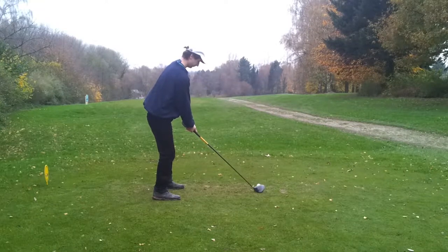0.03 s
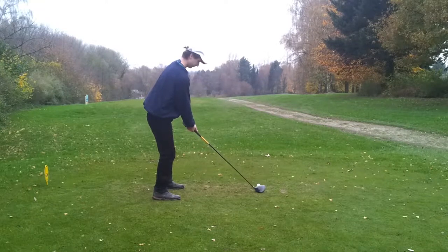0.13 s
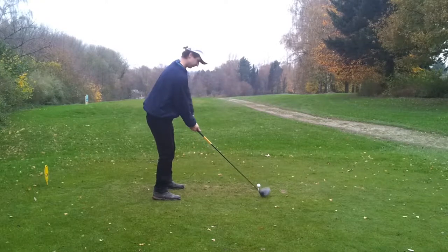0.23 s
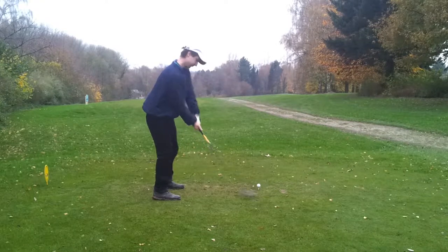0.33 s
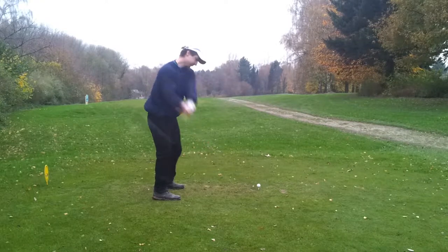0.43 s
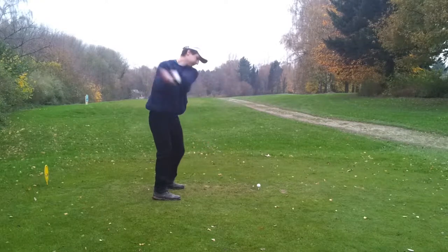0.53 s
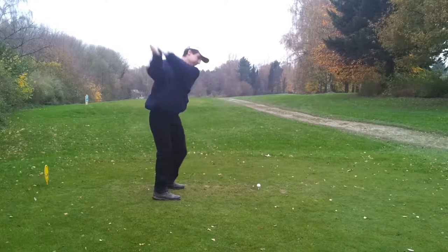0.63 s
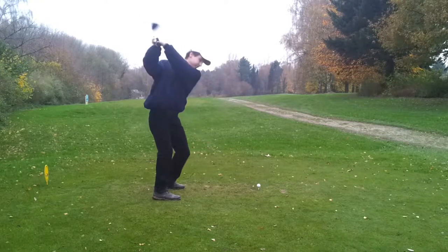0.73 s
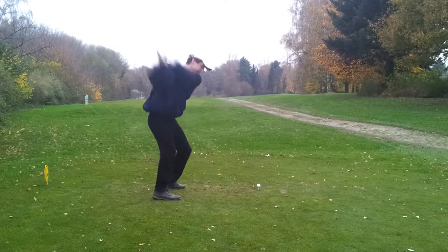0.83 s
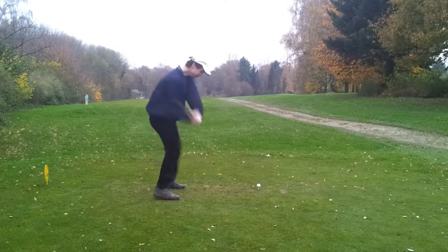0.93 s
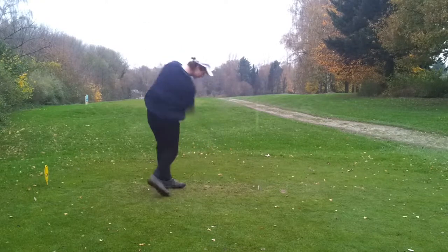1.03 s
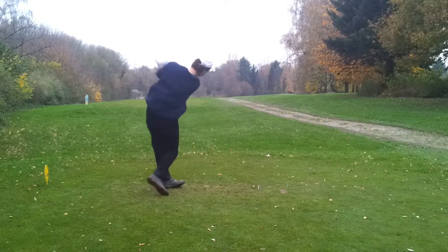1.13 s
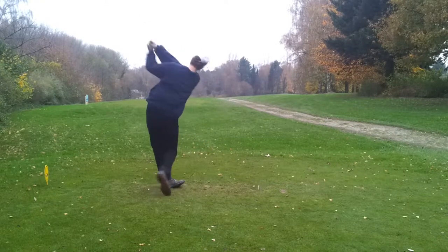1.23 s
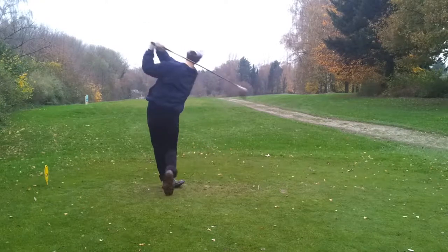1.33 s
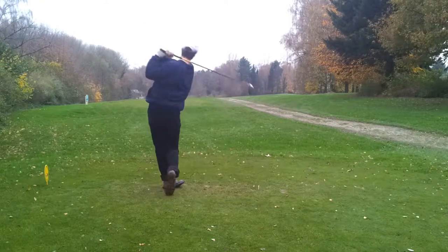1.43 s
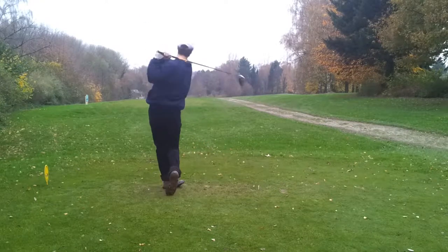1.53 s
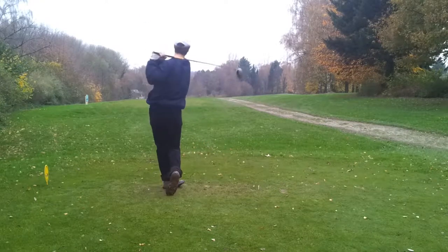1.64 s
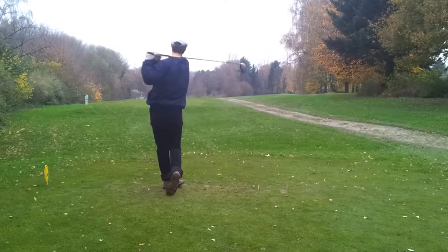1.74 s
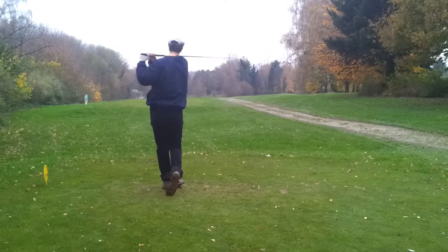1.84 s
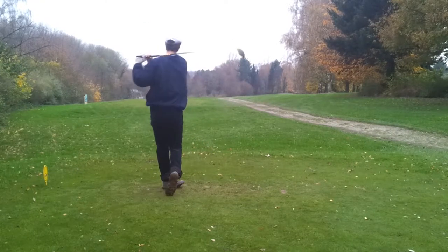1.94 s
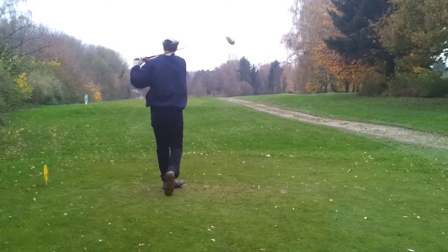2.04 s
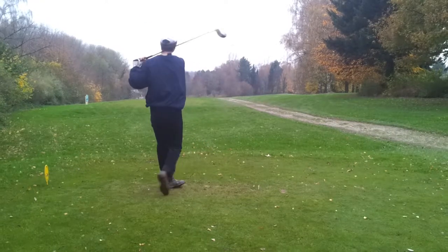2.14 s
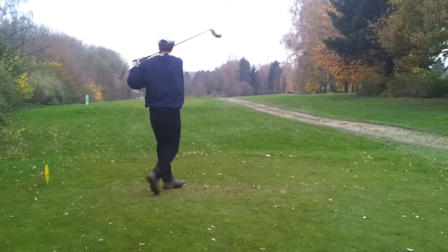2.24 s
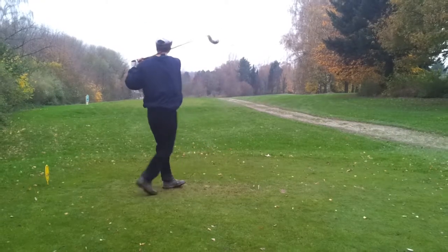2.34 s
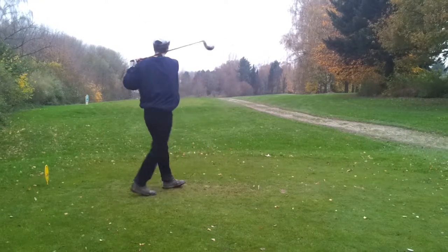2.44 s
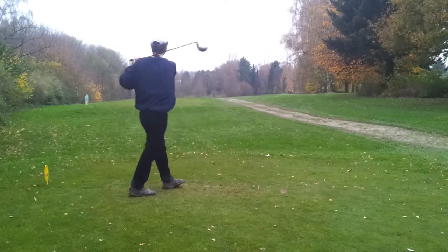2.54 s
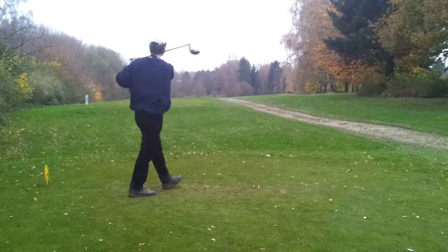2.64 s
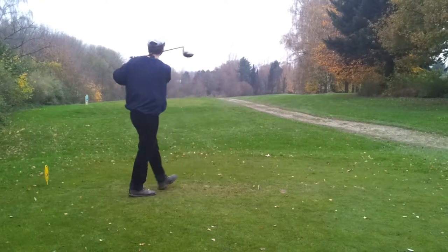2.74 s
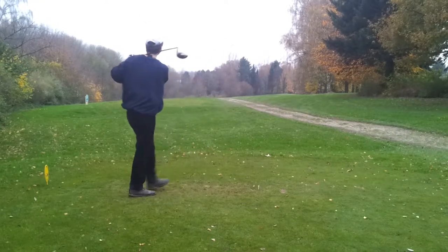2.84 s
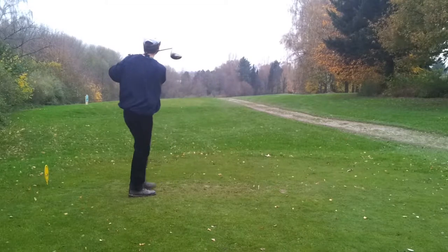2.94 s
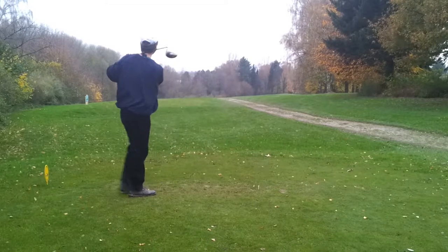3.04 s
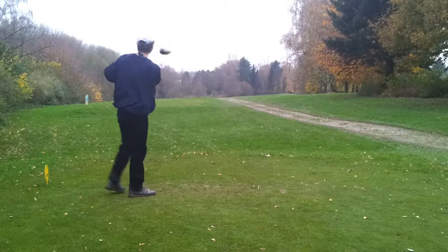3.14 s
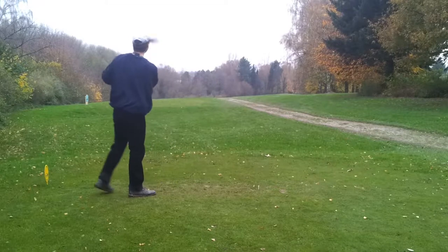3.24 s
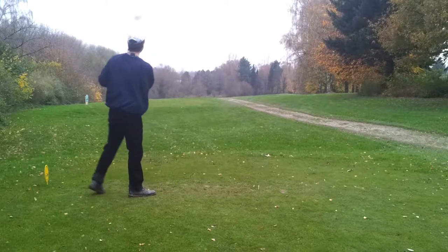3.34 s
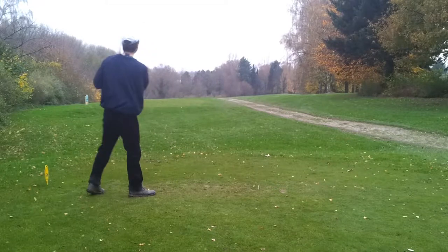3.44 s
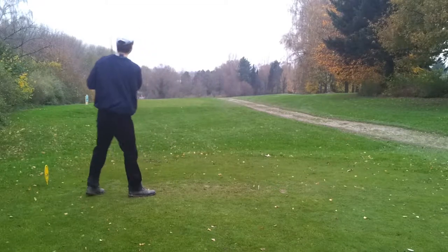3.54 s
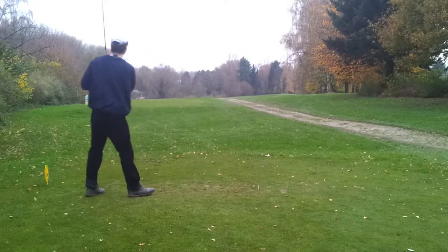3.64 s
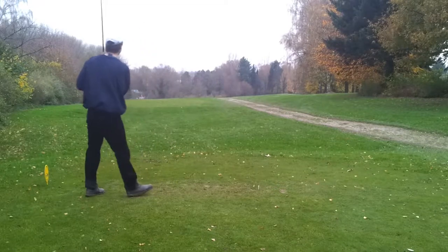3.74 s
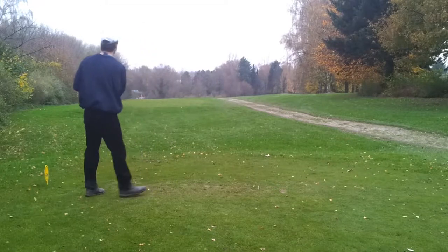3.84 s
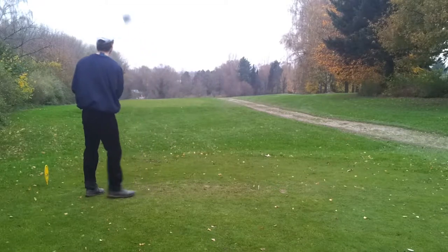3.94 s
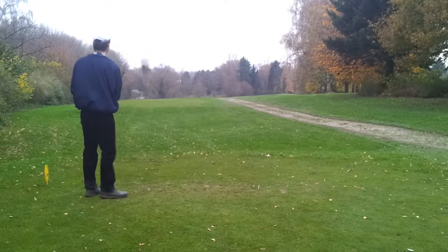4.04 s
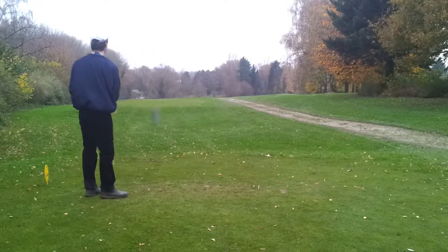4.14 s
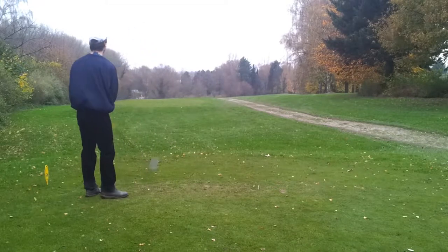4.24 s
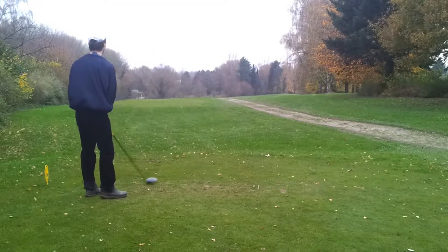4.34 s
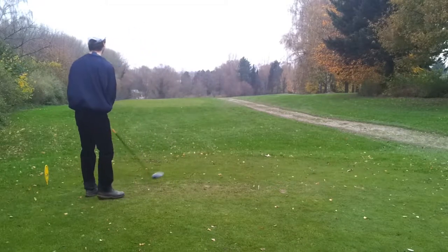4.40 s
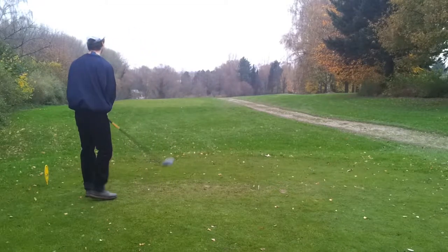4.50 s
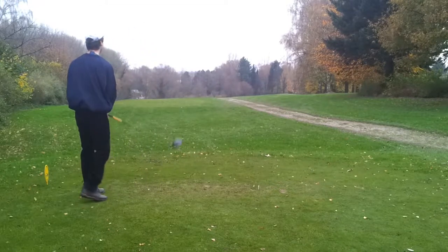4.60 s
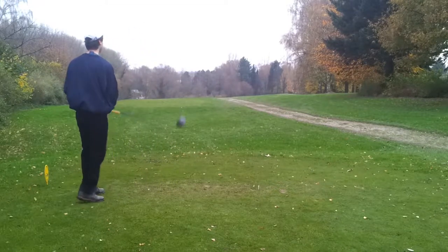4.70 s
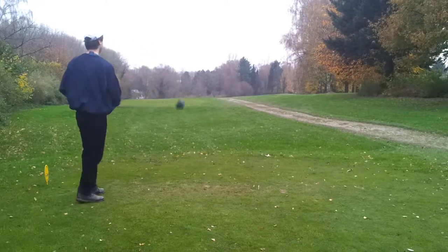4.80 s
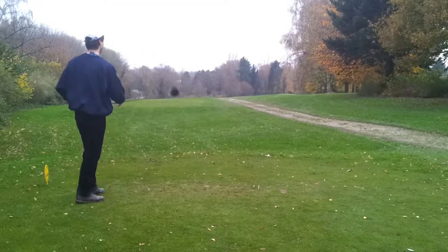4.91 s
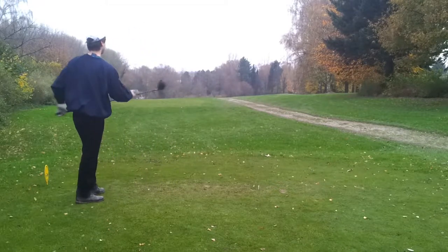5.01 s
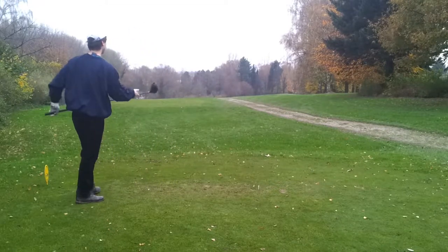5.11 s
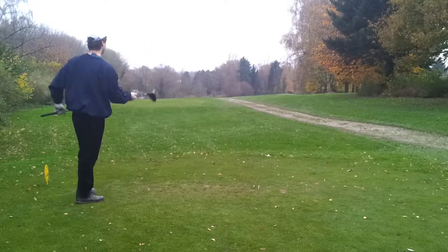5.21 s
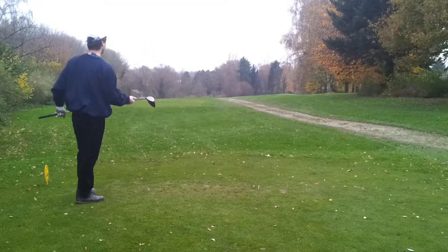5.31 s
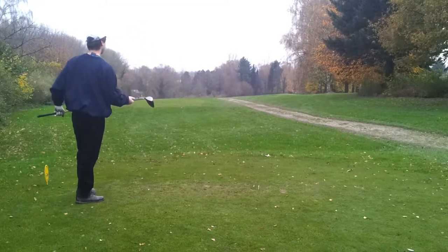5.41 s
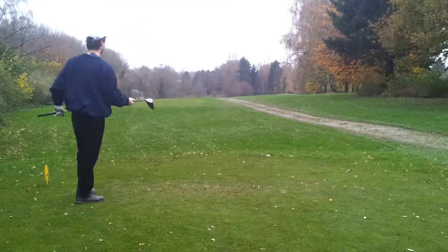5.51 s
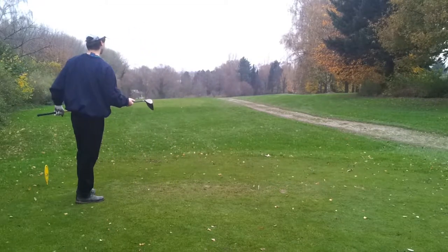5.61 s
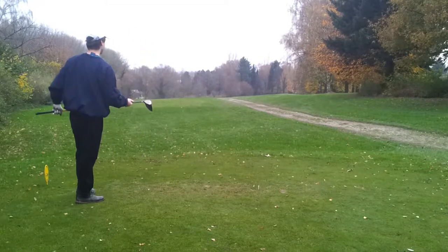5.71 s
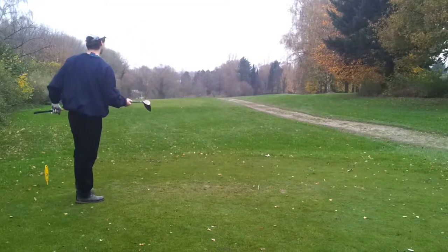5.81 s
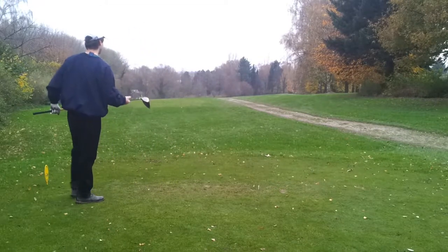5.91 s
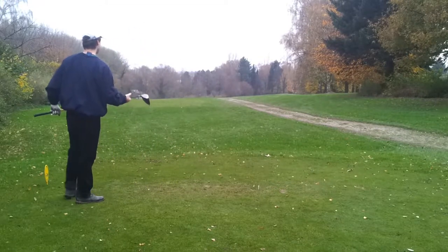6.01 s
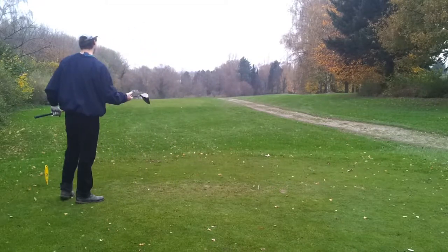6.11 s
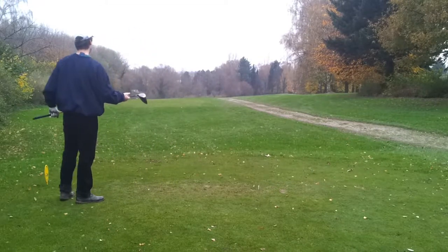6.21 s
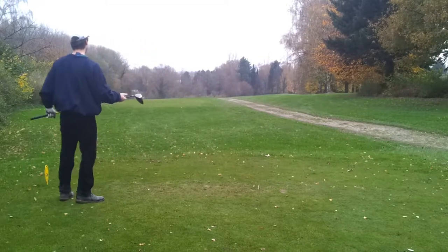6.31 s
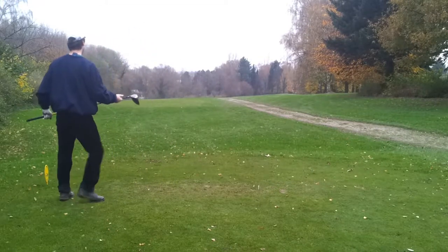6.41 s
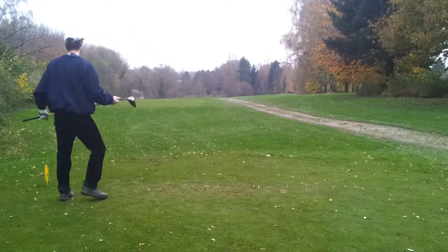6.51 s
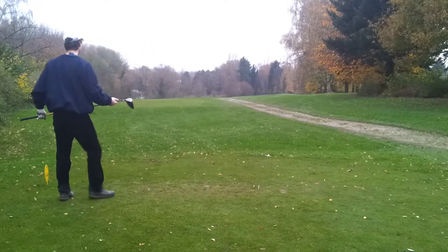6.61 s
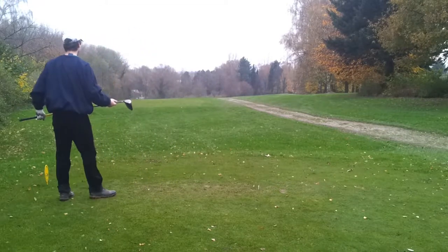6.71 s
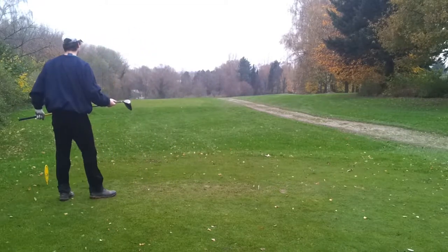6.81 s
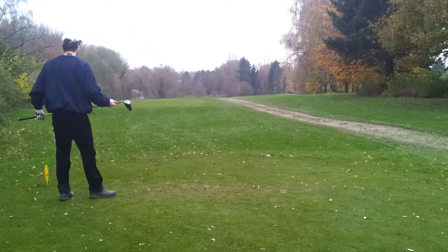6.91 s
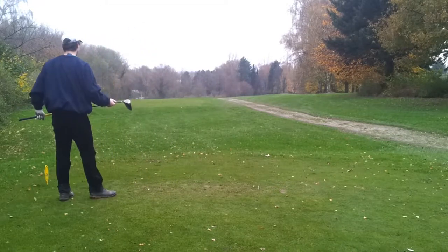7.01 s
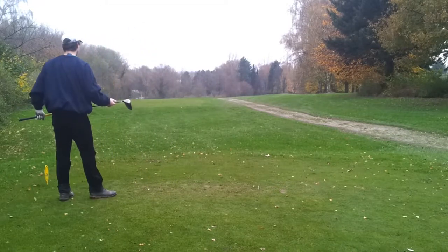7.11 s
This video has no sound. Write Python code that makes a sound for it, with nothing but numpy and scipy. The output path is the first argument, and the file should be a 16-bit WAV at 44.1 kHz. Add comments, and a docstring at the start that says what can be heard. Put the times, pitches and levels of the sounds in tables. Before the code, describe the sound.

A mono outdoor scene of about seven seconds on a tree-lined golf course. From the start there is quiet far traffic, a low rumble with soft roar, and a faint, slowly sagging engine hum near 130 hertz. At 1.05 s a very brief swish rises in pitch and hiss, leading at 1.2 s to one hard, dry, overloaded crack with a small low thud and a bright hollow metal ring around 6 kilohertz. The ring dips in pitch and blurs into dense, shimmering tree echoes, mostly gone by 2 s, with a weak tail behind. Dull, faint steps on turf come at 1.5 and 2.6 s, the latter with a soft rustle. Thin falling bird chirps dot 2.3 to 5.9 s. At 4.5 s the club taps the grass with a small tick and thump. Tiny rustles follow to 6.8 s; the hum swells most around 4.6 s.

```python
"""A hollow metal golf club swishes down and strikes a ball on a fairway lined with trees: crack, thud, ringing head.
The modes of the head ring while it flies on, Doppler-shifted: low as it leaves the listener, low to high
in the echoes from the trees, which are sparse random clicks through resonators. The swish is a climbing
shaft tone and band-passed hiss. Behind: steps and club on turf, rustles of clothes and grass, gliding
bird notes, a sagging engine hum with its octave, and far traffic as coloured noise."""
import sys
import numpy as np
from scipy import signal
from scipy.fft import rfft, irfft
from scipy.io import wavfile

SR = 44100
rng = np.random.default_rng(int(sys.argv[2]) if len(sys.argv) > 2 else 0)


def transcribe(u):
    """Save the signal u as a 16-bit wav file named by the first command-line argument.

    u: samples, shape (n,) or (channels, n), limited to [-1, 1]; the rate is SR.
    q: integer samples, one column per channel.
    """
    v = np.clip(np.atleast_2d(u).T, -1, 1)
    q = np.round(v * 32767).astype(np.int16)
    wavfile.write(sys.argv[1], SR, q)


N = 315429

STRIKE_S = 1.1957
HEAD_SPEED_M_PER_S, SOUND_SPEED_M_PER_S = 36.5, 343   # head just after the blow; air

# modes of the head at rest: f/Hz, relative direct level/dB, t60/s, relative echo level/dB,
# echo gain ahead over sideways/dB
HEAD_MODES = [(367.4, -20, 0.069, -50, 0), (547, -15, 0.035, -49.5, -3), (775, -12, .025, -39, 2),
              (1340, -17.5, 0.019, -28, 1.5), (1850, -12.5, 0.011, -27, -0.5), (3019, -20.5, .2, -5.5, 2),
              (4225, -13, 0.16, -12.5, 0), (4685, -13, .07, -16.5, 0.5), (6008, -1.5, .3, 0.5, -1.5),
              (5930, -7, 0.15, -7, 1.5), (6450, -11, 0.16, -15.5, 4), (7440, -22.5, 0.17, -12.5, 0),
              (7660, -11, 0.13, -19, 0), (8000, -13, 0.06, -30, 0)]


def from_db(db):
    """Gain of a level in dB."""
    return 10 ** (np.asarray(db) / 20)


def rms_one(x):
    """Scale to rms 1."""
    return x / np.sqrt(np.mean(x ** 2) + 1e-20)


def in_time(rows):
    """Interpolate the columns of a curve table, sample by sample."""
    t_s, *columns = np.transpose(rows)
    return [np.interp(np.arange(N) / SR, t_s, column) for column in columns]


def coloured(spectrum, size):
    """Noise of rms 1, its spectrum interpolated in dB over log frequency."""
    hz, db = np.transpose(spectrum)
    bins_hz = np.fft.rfftfreq(size, 1 / SR)
    shape_db = np.interp(np.log(bins_hz + 1), np.log(hz), db)
    white = rng.standard_normal(size)
    return rms_one(irfft(rfft(white) * from_db(shape_db), size))


def band(x, low_hz, high_hz):
    """Butterworth band-pass."""
    edges_hz = [low_hz, min(high_hz, SR / 2.2)]
    return signal.sosfilt(signal.butter(2, edges_hz, "band", fs=SR, output="sos"), x)


def ring(clicks, hz, t60_s):
    """Two-pole resonator: a unit click starts a decaying sine of height 1."""
    radius = from_db(-60 / (t60_s * SR))
    angle = 2 * np.pi * hz / SR
    return signal.lfilter([0, np.sin(angle)], [1, -2 * radius * np.cos(angle), radius ** 2], clicks)


def add(out, start_s, sound):
    """Mix a sound in at a time."""
    at = round(start_s * SR)
    out[at:at + len(sound)] += sound[:N - at]


def strike():
    """Pressure pulse as the ball squashes, its push on the air, and head modes shifted down by the speed."""
    crack_db, crack_half_cycle_ms = 8.5, 0.34
    thud_hz, thud_db, thud_t60_s = 110, -15.5, 0.039
    arc_radius_m, straight_away_s = 1.45, .011   # circular path; time after the blow when it points away
    shade_s, shade_db_per_s = .03, 1800.   # the golfer's body then shades the head
    ring_db = 5
    dip_s, dip_width_s, dip_db = .0028, .0012, 11   # the ring dips briefly after the crack

    t = np.arange(SR // 10) / SR
    away_m_per_s = HEAD_SPEED_M_PER_S * np.cos((t - straight_away_s) * HEAD_SPEED_M_PER_S / arc_radius_m)
    head_time_s = np.cumsum(1 / (1 + away_m_per_s / SOUND_SPEED_M_PER_S)) / SR   # as heard by the listener
    modes = sum(from_db(db - 60 * t / t60_s) * np.sin(2 * np.pi * hz * head_time_s)
                for hz, db, t60_s, *_ in HEAD_MODES)
    shade = shade_db_per_s * np.maximum(t - shade_s, 0)
    dip = dip_db * np.exp(-((t - dip_s) / dip_width_s) ** 2)
    ringing = from_db(ring_db - shade - dip) * modes * np.minimum(t / .0004, 1)

    half_cycles = t * 1000 / crack_half_cycle_ms
    pulse = -np.sin(np.pi * half_cycles) * np.exp(-.6 * half_cycles) * (half_cycles < 4)
    thud = from_db(thud_db - 60 * t / thud_t60_s) * np.sin(2 * np.pi * thud_hz * t)
    out = np.zeros(N)
    add(out, STRIKE_S, thud + from_db(crack_db) * pulse + ringing)
    return out


def echoes(directions=44, clicks_per_s=170.0):
    """Trees all round return the crack, and the ring at the pitch the moving head sends their way."""
    echo_t60_s = .09   # the ring as one tree returns it
    air_loss_db_per_s = 20   # at 6 kHz; grows with the square of pitch
    # colour of the crack's echo: f/Hz, relative level/dB
    crack_colour = [(100, -26), (300, -16), (600, 2.5), (1000, 1.5), (2000, -2.5), (4000, -1), (5200, -5),
                    (7500, -8)]

    size = SR * 3 // 2
    t = np.arange(size) / SR
    ring_gain, crack_gain = echo_gains(t)
    rings, lossless = np.zeros(size), np.zeros(size)
    for toward in np.cos(np.linspace(0, np.pi, directions)):   # 1 = ahead, -1 = behind
        shift = 1 / (1 - toward * HEAD_SPEED_M_PER_S / SOUND_SPEED_M_PER_S)
        trees = rng.standard_normal(size) * (rng.random(size) < clicks_per_s / SR) + 1e-18
        trees *= from_db(-7. * toward ** 2)   # most trees stand to the sides
        for rest_hz, _, _, db, ahead_db in HEAD_MODES:
            hz = rest_hz * shift
            echo = from_db(db + ahead_db * toward) * ring(trees, hz, echo_t60_s)
            lossless += echo
            rings += echo * from_db(-air_loss_db_per_s * t * (hz / 6000) ** 2)
    crack = coloured(crack_colour, size)
    fade = np.minimum((t[-1] - t) * 10, 1)
    out = np.zeros(N)
    add(out, STRIKE_S, fade * (ring_gain * rings / lossless.std() + crack_gain * crack))
    return out


def echo_gains(t):
    """Gains of ring and crack echoes: each group of reflectors builds up and dies; their powers add."""
    # groups: delay/s, build-up/s, t60/s, ring level before air loss/dB, crack level/dB
    reflectors = [(0.0002, .001, .03, -30, -9), (.003, .006, .24, -6, -27),
                  (.06, 0.022, 0.74, -18.5, -31.5), (.15, 0.12, 2.7, -41, -54.5)]
    power = 0
    for delay_s, rise_s, t60_s, *levels_db in reflectors:
        build_up = np.clip((t - delay_s) / rise_s, 0, 1)
        decay = from_db(-60 * np.maximum(t - delay_s - rise_s, 0) / t60_s)
        power = power + np.outer(from_db(levels_db), build_up * decay) ** 2
    return np.sqrt(power)


def swish():
    """The shaft sheds eddies at a pitch set by its speed; the head hisses through the air."""
    start_s, stop_s = 1.05, 1.26
    shed_hz, shed_hz_per_s = 400., 2800.   # climbs up to the blow, then holds

    t = np.arange(N) / SR
    tone_hz = shed_hz + shed_hz_per_s * (np.clip(t, start_s, STRIKE_S) - start_s)
    flutter = rms_one(band(rng.standard_normal(N), 5, 90.))
    tone = flutter * np.sin(2 * np.pi * np.cumsum(tone_hz) / SR) * np.sqrt(2)
    hiss = rms_one(band(rng.standard_normal(N), 1200., 7800.))
    tone_gain = swell(peak_s=1.152, peak_db=-36.5, rise_db_per_s=450., fall_db_per_s=350.)
    hiss_gain = swell(peak_s=STRIKE_S, peak_db=-38, rise_db_per_s=190., fall_db_per_s=550.)
    return (tone_gain * tone + hiss_gain * hiss) * (t > start_s) * (t < stop_s)


def swell(peak_s, peak_db, rise_db_per_s, fall_db_per_s):
    """Gain that climbs to a peak and falls, at steady dB per second."""
    t = np.arange(N) / SR - peak_s
    return from_db(peak_db + np.minimum(rise_db_per_s * t, -fall_db_per_s * t))


def knocks():
    """Feet and club on turf: a dull ring of the ground, a tick of grass and damped modes of the head."""
    thump_t60_s, head_t60_s = .026, .03
    # t/s, thump level/dB, thump f/Hz, tick gain/dB, head gain/dB
    turf_hits = [(1.535, -38, 366, -76, -80), (2.626, -35, 422, -69.5, -80),
                 (4.488, -30.5, 298, -29.5, -48.5)]

    out = np.zeros(N)
    t = np.arange(SR // 10) / SR
    head = sum(from_db(0.33 * echo_db - 60 * t / head_t60_s) * np.sin(2 * np.pi * hz * t)
               for hz, _, _, echo_db, _ in HEAD_MODES)
    for start_s, thump_db, thump_hz, tick_db, head_db in turf_hits:
        thump = from_db(thump_db - 60 * t / thump_t60_s) * np.sin(2 * np.pi * thump_hz * t)
        snap = from_db(tick_db - 60 * t / .01)
        settling = from_db(tick_db - 18 - 60 * t / 0.16)   # grass
        noise = band(rng.standard_normal(len(t)), 500., 8000.)
        tick = (snap + settling) * noise * np.minimum(t / .001, 1)
        add(out, start_s, thump + tick + from_db(head_db) * head)
    return out


def rustles():
    """Clothes and grass: soft swells of noise in a band under an octave wide."""
    # t/s, length/s, band reference f/Hz, level before the swell/dB
    brushes = [(2.567, 0.13, 600.4, -54), (4.12, 0.11, 6040, -61.5), (4.755, 0.095, 3025, -64),
               (4.835, 0.14, 6500, -67), (5.36, .11, 5820, -63.5), (6.83, .07, 5800, -62.5)]
    out, noise = np.zeros(N), rng.standard_normal(N)
    for start_s, length_s, hz, db in brushes:
        size = round(length_s * SR)
        hiss = rms_one(band(noise[round(start_s * SR):][:size], hz / 1.3, hz * 1.07))
        add(out, start_s, from_db(db) * hiss * np.sin(np.linspace(0, np.pi, size)) ** 0.24)
    return out


def birds():
    """Thin whistles: sines gliding in pitch under a half-sine envelope."""
    low_length_s, low_first_hz, low_last_hz = .028, 3090, 2250
    # one falling chirp, repeated: t/s, rms level at the envelope's peak/dB
    low_chirps = [(2.68, -62), (3.43, -60), (4.193, -61.5), (4.8, -63)]
    # other notes: t/s, length/s, first f/Hz, last f/Hz, rms level at the envelope's peak/dB
    whistles = [(2.295, .052, 4550, 4370, -69), (3.29, .055, 4650, 4420, -65),
                (3.456, .065, 4340, 4440, -64.5), (3.655, .085, 4410, 4260, -69),
                (3.675, .031, 7650, 6900, -63), (4.132, .022, 7700, 7100, -60),
                (4.874, .022, 7400, 6400, -64), (5.175, .028, 7600, 7200, -65),
                (5.385, .03, 5400, 4200, -66), (5.815, .058, 7450, 6850, -64.5),
                (5.85, .071, 6900, 6250, -59.5)]

    out = np.zeros(N)
    notes = [(start_s, low_length_s, low_first_hz, low_last_hz, db) for start_s, db in low_chirps]
    notes += list(whistles)
    for start_s, length_s, first_hz, last_hz, db in notes:
        u = np.linspace(0, 1, round(length_s * SR))
        phase = 2 * np.pi * np.cumsum(first_hz + (last_hz - first_hz) * u) / SR
        add(out, start_s, np.sqrt(2) * from_db(db) * np.sin(np.pi * u) * np.sin(phase))
    return out


def hum():
    """A slowly sagging engine note and its octave, wavering a little in the moving air."""
    start_hz, sag_hz_per_s = 133.7, 0.46
    waver_hz, waver_db = .4, 0.7   # rms
    # far engine: t/s, tone level before waver/dB, octave level before waver/dB
    engine_levels = [(0, -51, -66), (.7, -59, -70.5), (1.5, -48, -64), (2.5, -50, -67), (3, -53.5, -59),
                     (4.2, -48, -59), (4.6, -42.5, -65.5), (5, -46.5, -76), (5.5, -48, -67),
                     (5.9, -56, -63), (6.3, -56.5, -66.5), (6.7, -50.5, -59.5), (7.15, -56, -64)]

    tone_db, octave_db = in_time(engine_levels)
    pitch_waver, level_waver = rms_one(band(rng.standard_normal((2, N)), 0.63, 2.7))
    tone_hz = start_hz - sag_hz_per_s * np.arange(N) / SR + waver_hz * pitch_waver
    phase = 2 * np.pi * np.cumsum(tone_hz) / SR
    tones = from_db(tone_db) * np.sin(phase) + from_db(octave_db) * np.sin(2 * phase)
    return np.sqrt(2) * from_db(waver_db * level_waver) * tones


def traffic():
    """Far tyres and engines blend into steady noise: a rumble and a roar above it."""
    rumble_db, roar_db, split_hz = -42, -50, 170.
    # noise spectrum: f/Hz, relative level per Hz/dB
    road_spectrum = [(12, -47.5), (20, -18), (49, -4.5), (69, -4), (102, -12), (134, -12.5), (148, -13),
                     (163, -19.5), (184, -17), (230, -22), (261, -19), (295, -19), (1090, -17), (3230, -39),
                     (7300, -42.5), (9490, -72), (16100, -120)]
    noise = coloured(road_spectrum, N)
    low = signal.sosfiltfilt(signal.butter(2, split_hz, fs=SR, output="sos"), noise)
    return from_db(rumble_db) * rms_one(low) + from_db(roar_db) * rms_one(noise - low)


def scene():
    """All sources at one microphone."""
    club = strike() + echoes() + swish()
    background = knocks() + rustles() + birds() + hum() + traffic()
    return (club + background)[None]


def record(dry):
    """The blow overloads the recorder, bending smoothly to a ceiling; a steep low-pass cuts the top."""
    ceiling, cutoff_hz = 0.8, 7500
    clipped = dry / (1 + np.abs(dry / ceiling) ** 6) ** (1 / 6)
    low_pass = signal.ellip(14, .5, 80, cutoff_hz, fs=SR, output="sos")   # ripple/dB, stop-band loss/dB
    return signal.sosfilt(low_pass, clipped)


dry = scene()
out = record(dry)
transcribe(out)
```